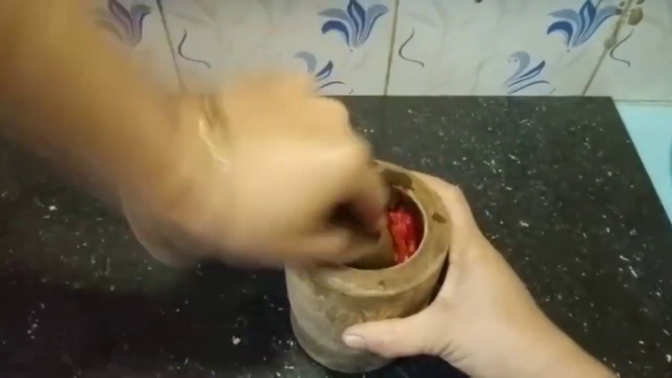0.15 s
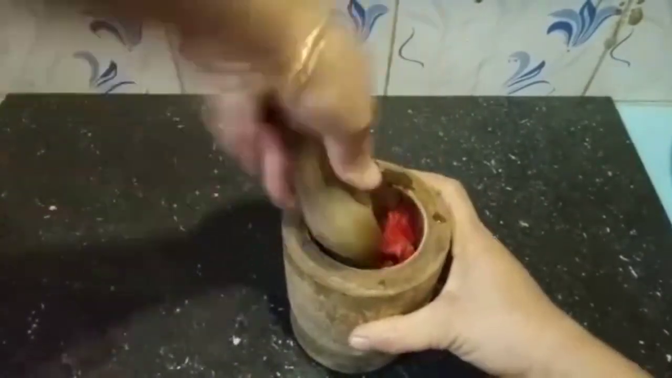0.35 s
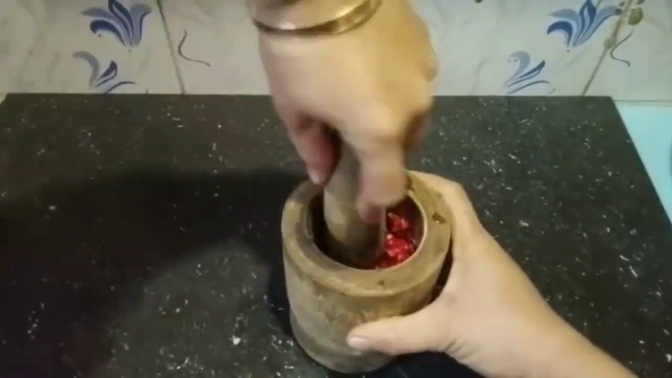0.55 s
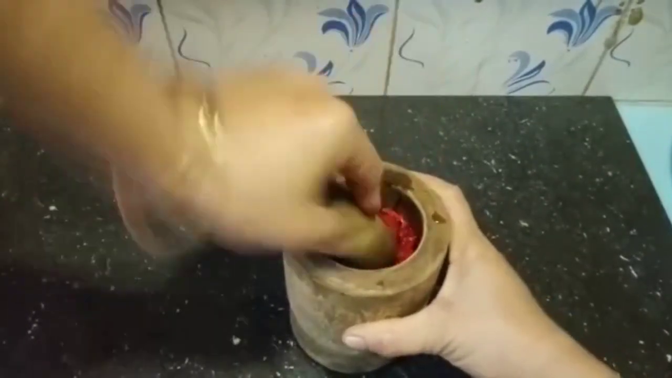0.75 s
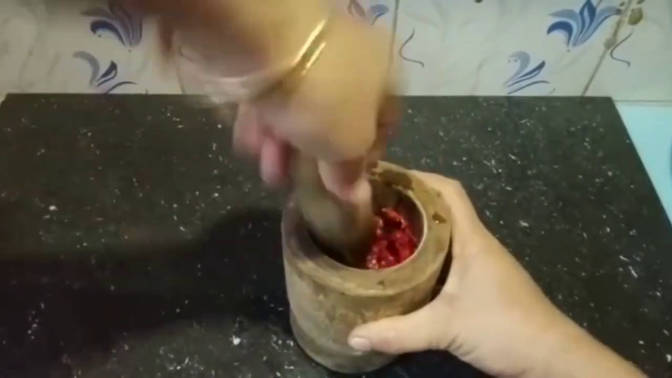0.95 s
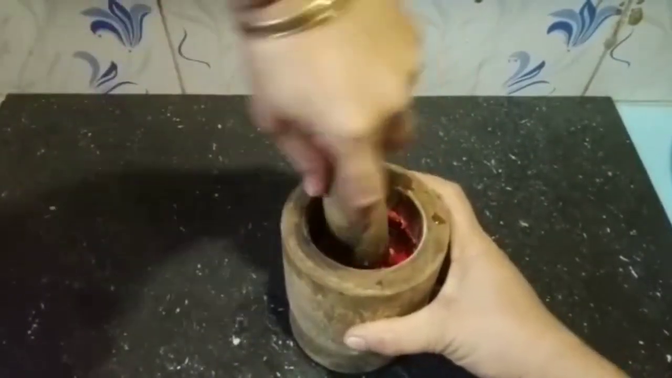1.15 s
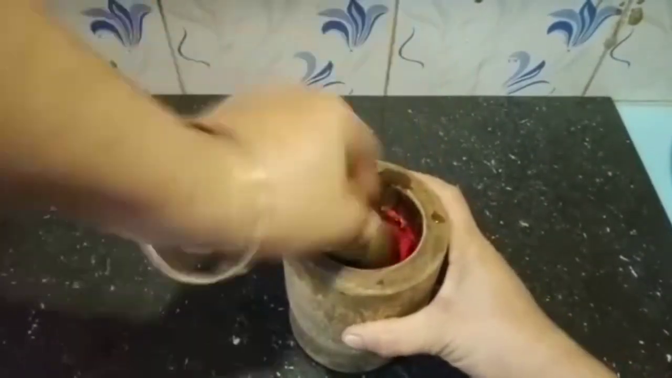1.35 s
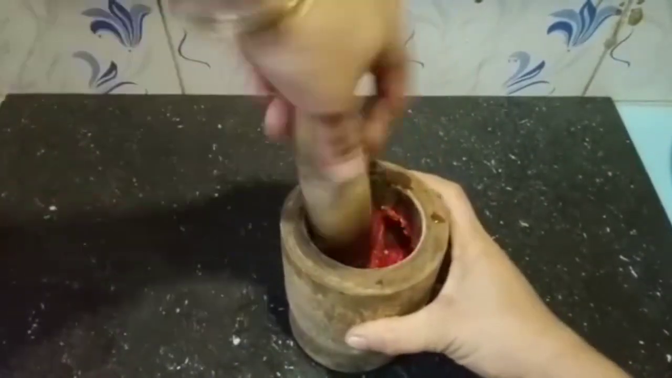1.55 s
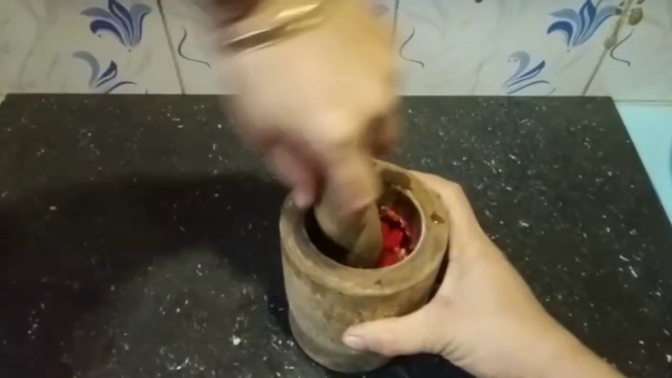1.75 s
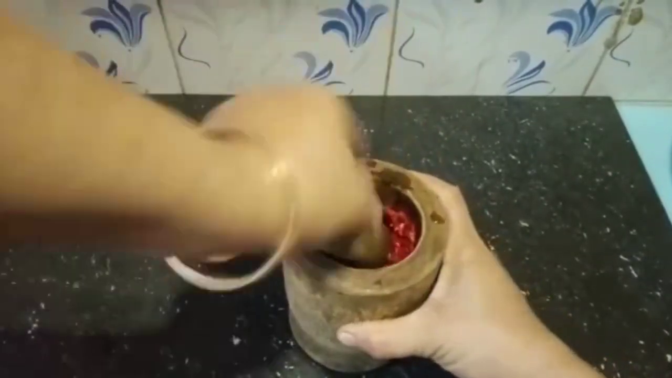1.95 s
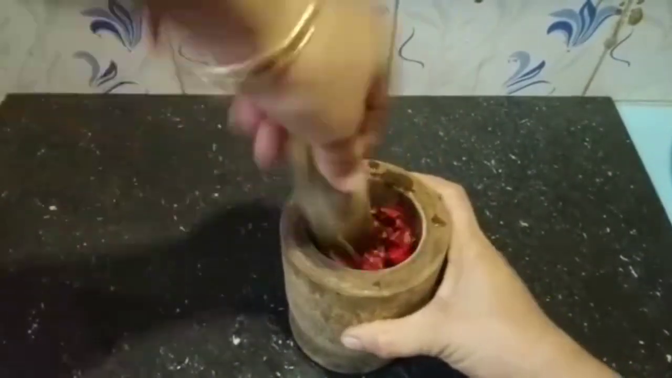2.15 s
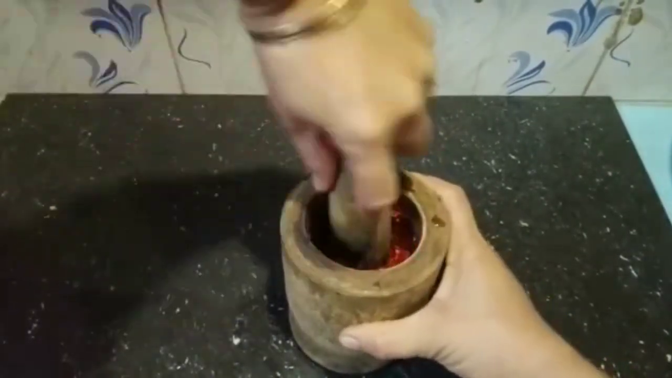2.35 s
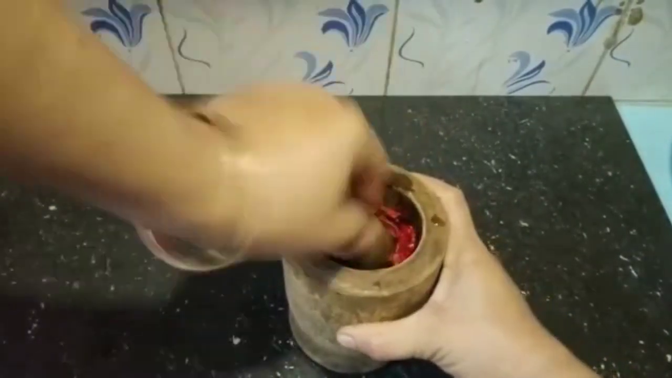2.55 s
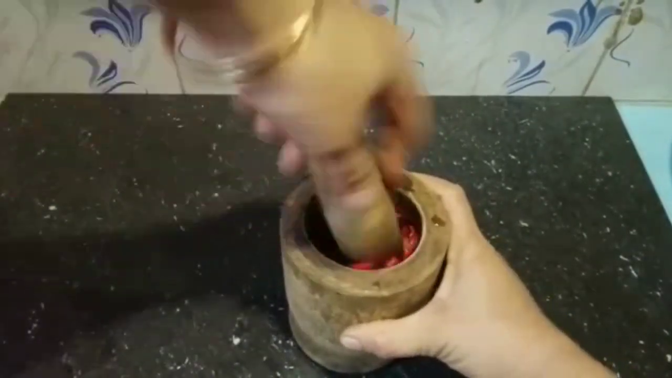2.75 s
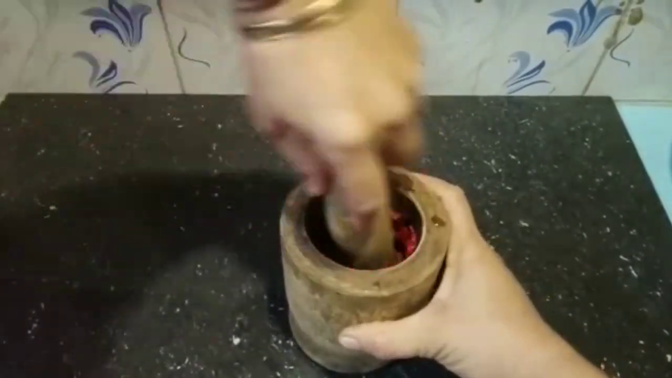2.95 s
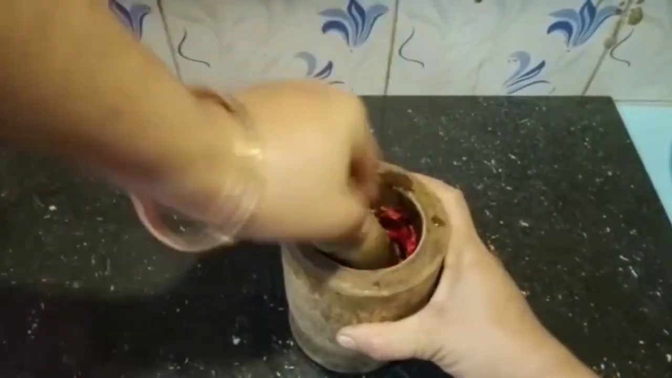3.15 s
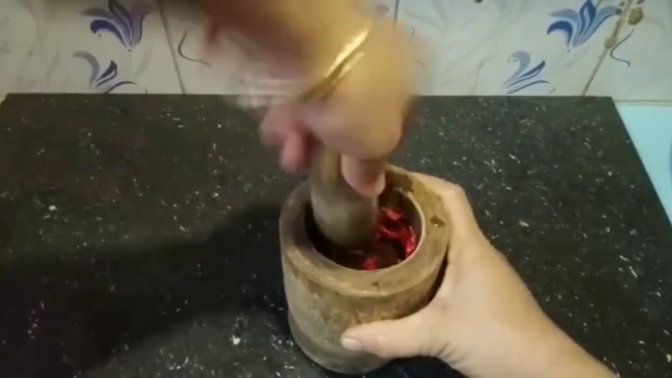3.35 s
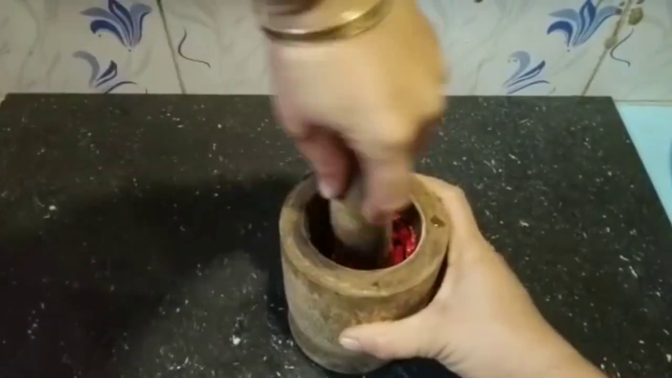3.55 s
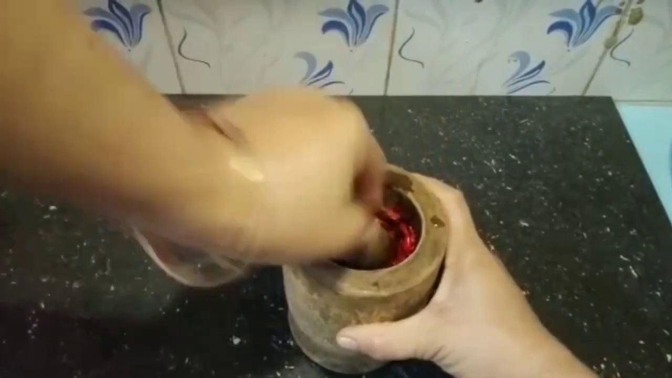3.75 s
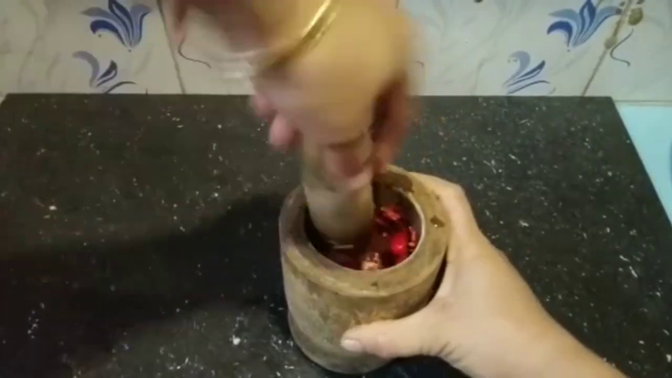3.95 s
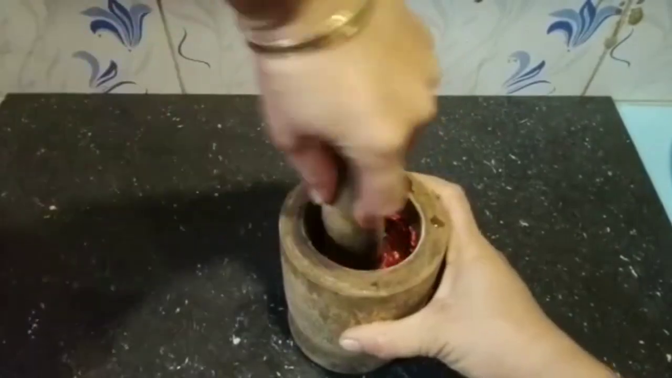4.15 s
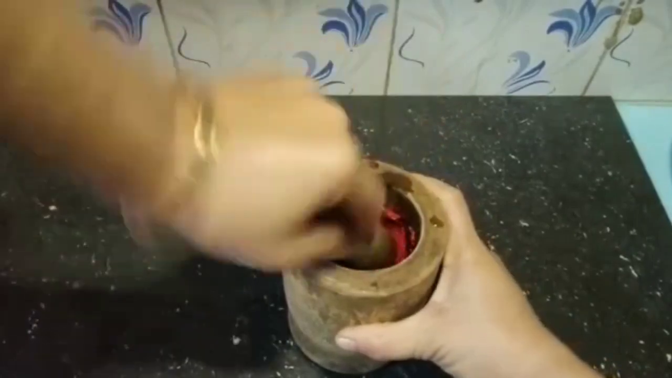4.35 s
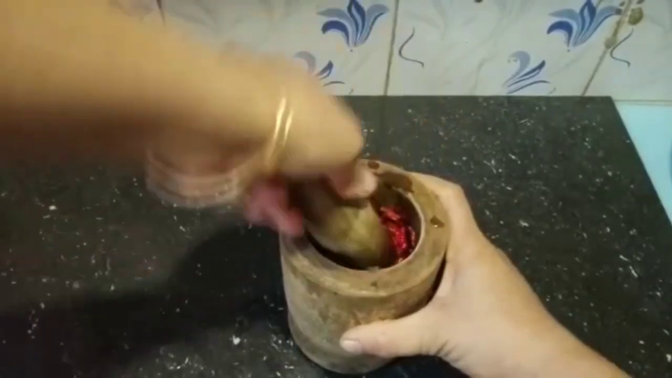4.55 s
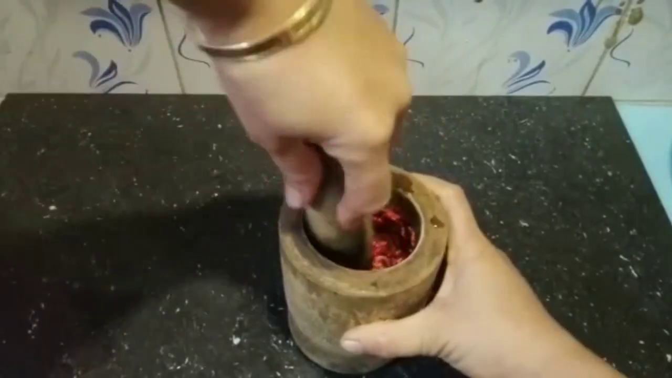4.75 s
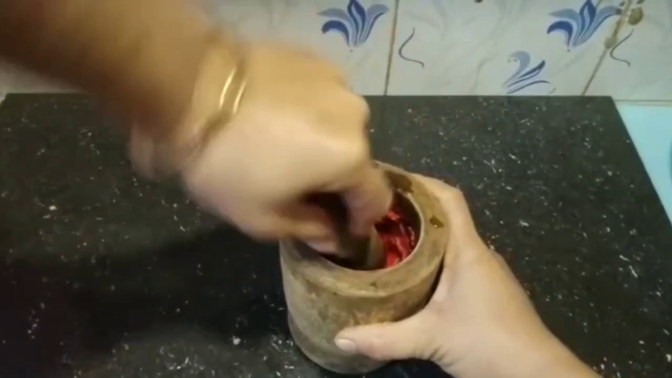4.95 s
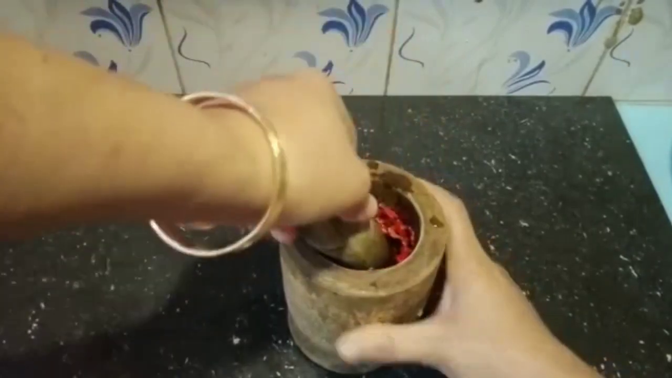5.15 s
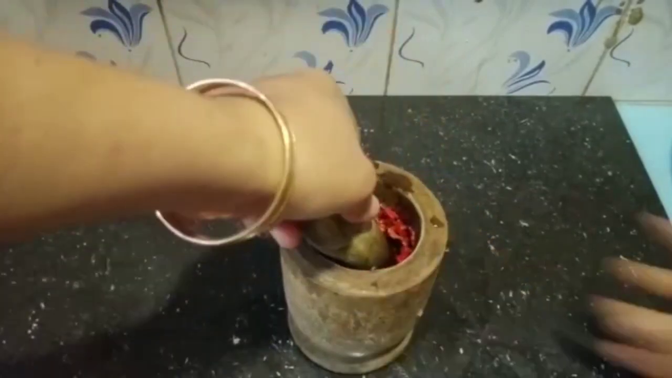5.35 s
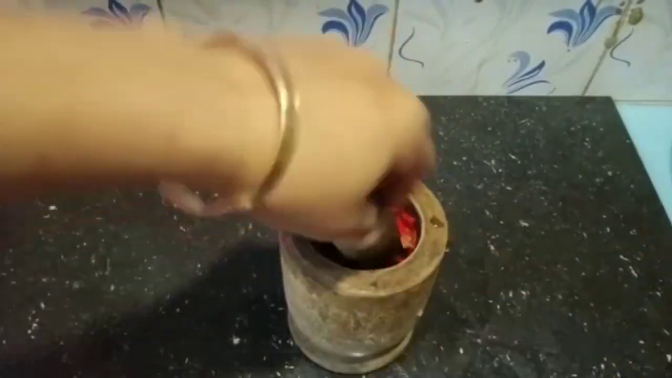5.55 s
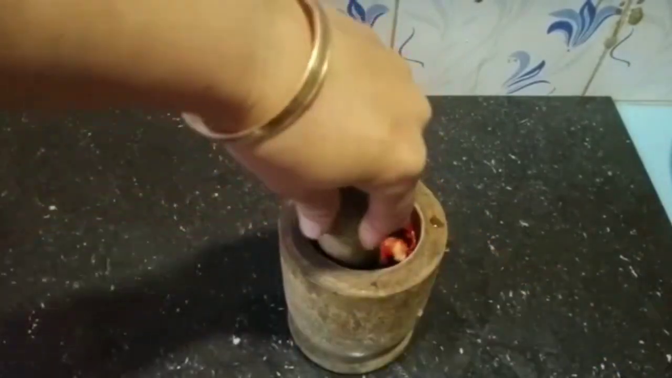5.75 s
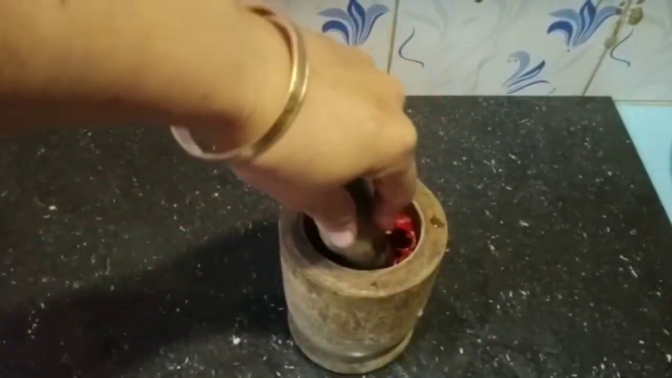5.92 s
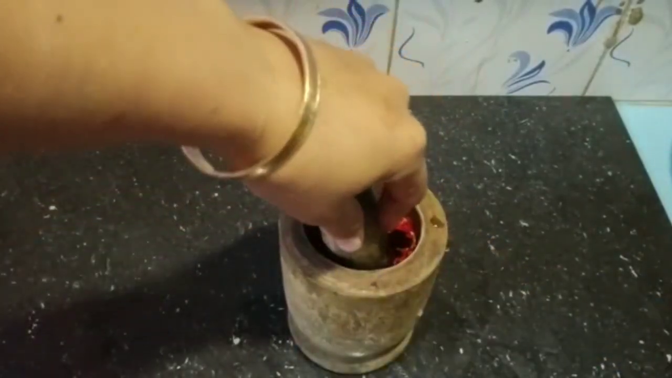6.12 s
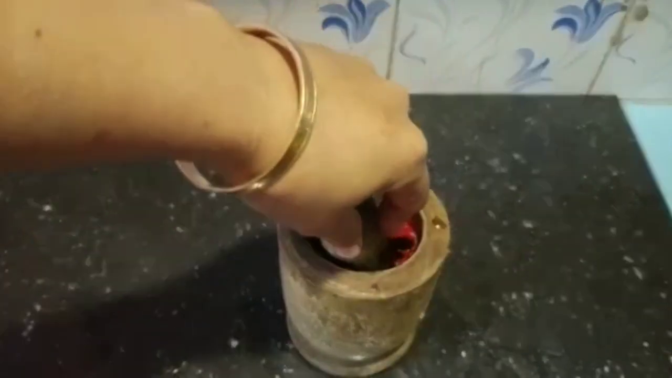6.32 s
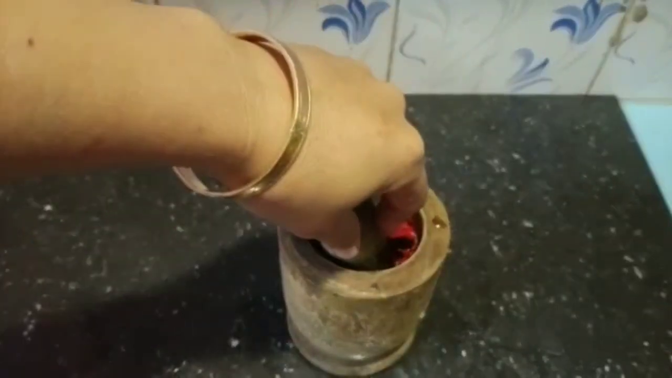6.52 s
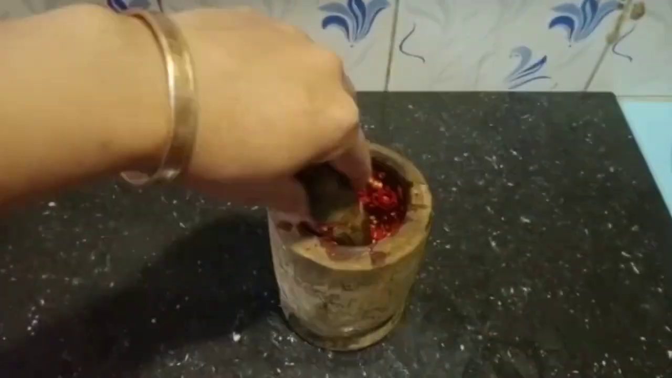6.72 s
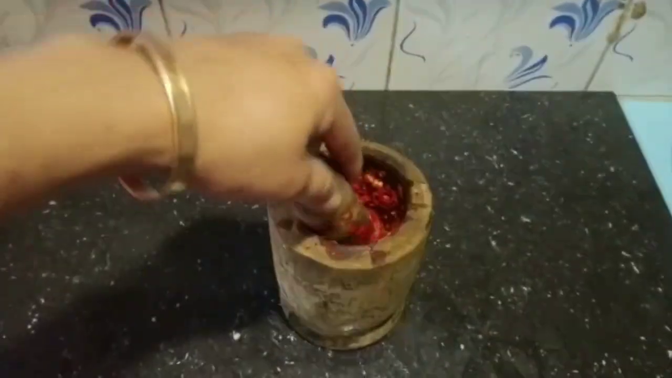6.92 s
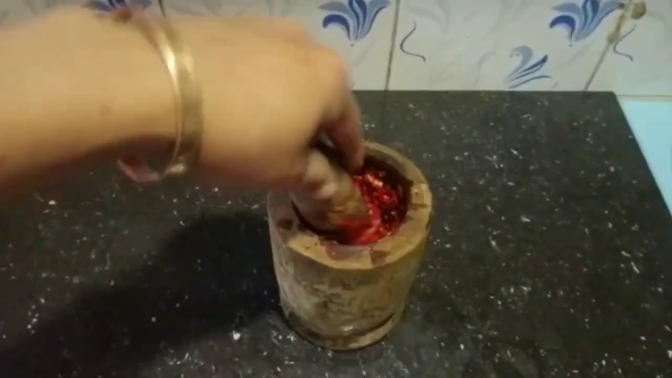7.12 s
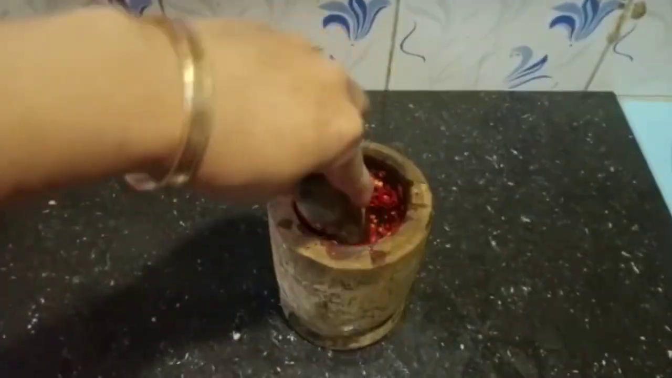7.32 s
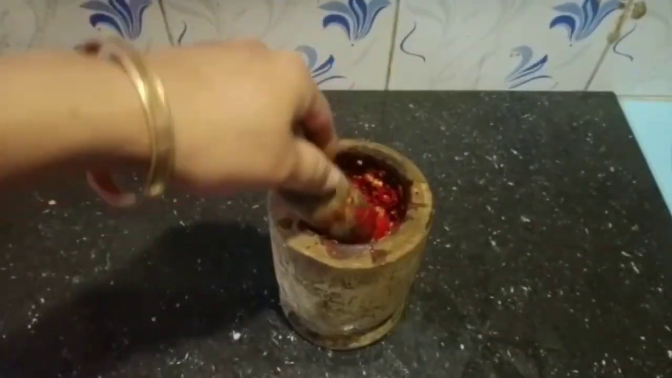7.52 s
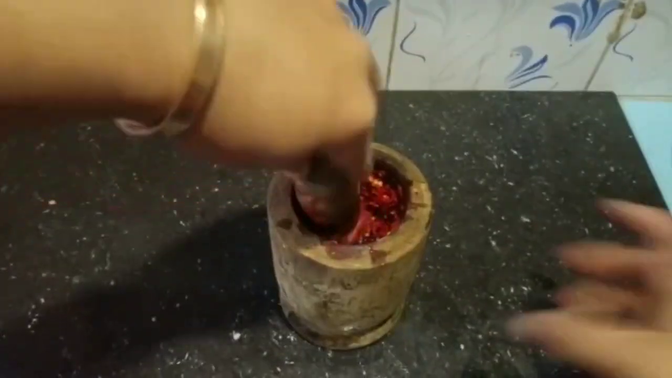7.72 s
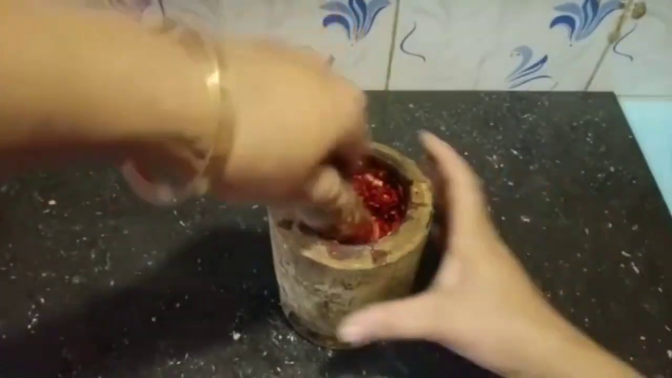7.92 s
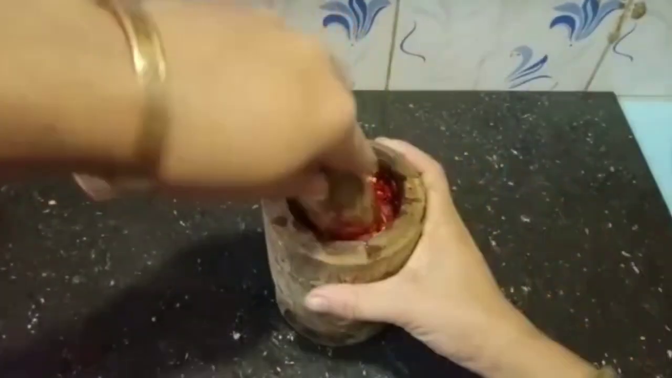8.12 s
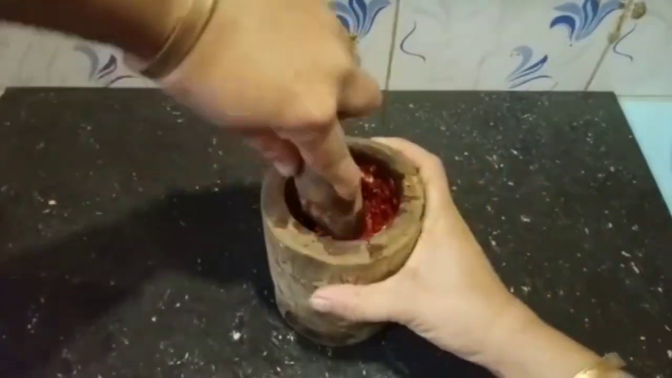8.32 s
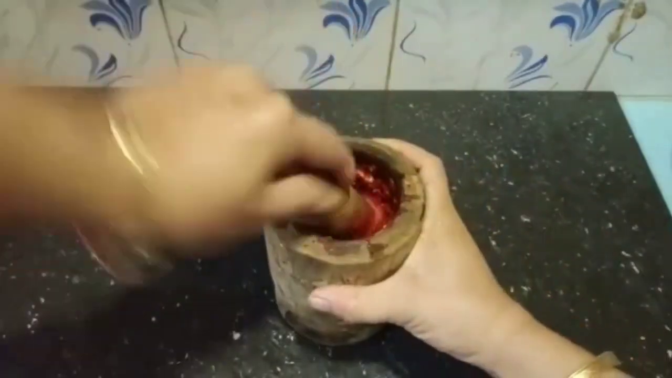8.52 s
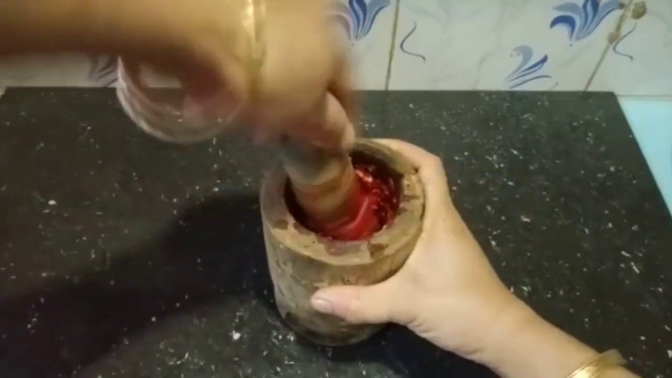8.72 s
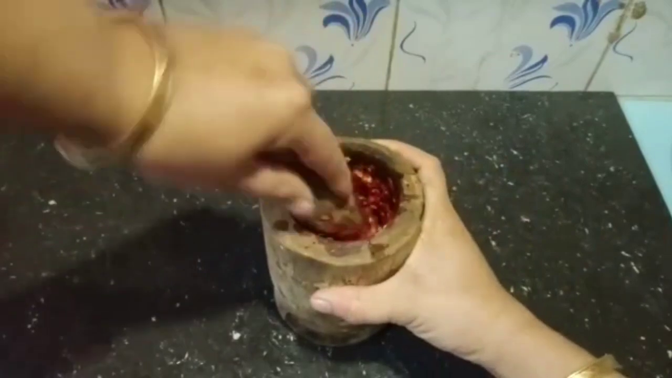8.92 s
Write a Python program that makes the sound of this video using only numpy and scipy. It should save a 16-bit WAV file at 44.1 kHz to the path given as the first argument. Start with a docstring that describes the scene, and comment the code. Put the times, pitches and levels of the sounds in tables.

```python
"""Dull knocks of a wooden pestle pounding chillies in a hand-held wooden mortar, over a bright hiss.
Each blow rings the bowl and bursts the pulp. Between blows the pestle grinds and scrapes the wall
by stick-slip friction, tearing skins and snapping seeds. A stone counter and kitchen tiles echo it,
and air buffets the microphone. The hiss drops away suddenly before the last, lighter blows."""
import sys
import numpy as np
from scipy import signal
from scipy.fft import rfft, irfft
from scipy.io import wavfile
from scipy.ndimage import uniform_filter1d, minimum_filter1d, map_coordinates

SR = 44100
rng = np.random.default_rng(int(sys.argv[2]) if len(sys.argv) > 2 else 0)


def wav_out(sig):
    """Save sig, one row per channel (or a flat mono array), as 16-bit PCM at SR to the path in sys.argv[1]."""
    wavfile.write(sys.argv[1], SR, np.round(np.clip(np.atleast_2d(sig).T, -1, 1) * 32767).astype(np.int16))


N = 400428
TIME = np.arange(N) / SR
TOP_HZ = 15750
HISS_STOP_S = 6.675


def undb(db):
    """Decibels to gain."""
    return 10 ** (np.asarray(db) / 20)


def unit(x):
    """Scale to rms 1."""
    return x / np.sqrt(np.mean(x ** 2))


def log_interp(hz, points):
    """Read (frequency, value) points on a log-frequency axis."""
    point_hz, value = np.transpose(points)
    return np.interp(np.log(hz + 1), np.log(point_hz), value)


def colour(x, points):
    """Minimum-phase filter through (frequency [Hz], gain [dB]) points."""
    size = 2048
    gain = undb(log_interp(np.fft.rfftfreq(size, 1 / SR), points))
    cepstrum = irfft(np.log(gain))
    cepstrum[1:size // 2] *= 2
    cepstrum[size // 2 + 1:] = 0
    return signal.oaconvolve(x, irfft(np.exp(rfft(cepstrum))))[:len(x)]


def band(x, lo_hz, hi_hz, order=2):
    """Butterworth band-pass."""
    return signal.sosfilt(signal.butter(order, [lo_hz, hi_hz], "band", fs=SR, output="sos"), x)


def split(x, hz):
    """The parts below and above a frequency."""
    low = signal.sosfiltfilt(signal.butter(4, hz, fs=SR, output="sos"), x)
    return low, x - low


def resonate(x, resonances):
    """Drive (centre [Hz], width [Hz], gain [dB]) resonances; rms 1."""
    return unit(sum(undb(db) * band(x, hz - width / 2, hz + width / 2) for hz, width, db in resonances))


def recent_mean(x, span_s):
    """Trailing moving average."""
    size = int(span_s * SR)
    return uniform_filter1d(x, size, origin=(size - 1) // 2)


def walk(rate_hz):
    """Random wander, spread near 1."""
    return np.interp(TIME * rate_hz, np.arange(2048), rng.standard_normal(2048))


def hold(start_s, end_s, attack_s, release_s, sag_db_per_s=0):
    """Envelope: linear attack, sagging hold, exponential release."""
    age_s = np.maximum(TIME - start_s, 0)
    release = np.exp(-np.maximum(TIME - end_s, 0) / release_s)
    return np.minimum(age_s / attack_s, 1) * undb(-sag_db_per_s * age_s) * release


def swell(peak_s, length_s, rise_share=0.4):
    """Pressure of one stroke, building and letting go."""
    rise = ((TIME - peak_s) / (rise_share * length_s)) ** 2
    fall = (TIME - peak_s) / ((1 - rise_share) * length_s)
    return np.exp(-np.where(TIME < peak_s, rise, fall))


def slips(rate_hz, spread_db):
    """Stick-slip friction: random impulses of unequal size; rms 1."""
    sizes = undb(spread_db * rng.exponential(size=N).clip(0, 4)) * rng.choice([-1, 1], N)
    return unit(sizes * (rng.random(N) < rate_hz / SR))


def rippled_noise(points, ripple_db, drift_db, drift_hz, smooth_below_hz=1500):
    """Coloured noise with fine spectral ripples, some steady and some drifting; rms 1."""
    hz, t, spectrum = signal.stft(rng.standard_normal(N), SR, nperseg=1024)
    ripples = rng.standard_normal((len(hz) // 2 + 1, 64))
    grid = np.meshgrid(np.arange(len(hz)) / 2, 1 + t * drift_hz, indexing="ij")
    steady = np.interp(grid[0][:, :1], np.arange(len(ripples)), ripples[:, 0])
    drifting = map_coordinates(ripples, grid, order=1, mode="mirror")
    depth = np.clip(hz / smooth_below_hz, 0.4, 1)[:, None]
    spectrum *= undb(depth * (ripple_db * steady + drift_db * drifting))
    return unit(colour(signal.istft(spectrum, SR)[1][:N], points))


# Faint hiss spectrum: (frequency [Hz], gain [dB])
FAINT_SPECTRUM = [(30, -14), (150, -2.5), (350, -6), (700, -12), (1200, -8), (2800, -8), (4000, -4.5),
                  (4850, -9.5), (6300, -3), (8100, 8), (10000, 1), (12700, -5), (15500, -0.5)]

def faint_hiss(high_db=-61, low_db=-69.5, dip_db=-4, settle_s=0.77):
    """A faint hiss whose lower part starts weak and comes up after the loud hiss stops."""
    noise = rippled_noise(FAINT_SPECTRUM, ripple_db=2.7, drift_db=2.5, drift_hz=1.983)
    low, high = split(noise, hz=6130)
    dip = np.exp(-np.maximum(TIME - HISS_STOP_S, 0) / settle_s)
    return unit(high) * undb(high_db) + unit(low) * undb(low_db + dip_db * dip)


# Loud hiss spectrum: (frequency [Hz], gain [dB])
LOUD_SPECTRUM = [(30, -12), (100, -1.5), (220, -3), (370, 0), (700, -7.5), (1500, -7.5), (3000, -11),
                 (3900, -9.5), (4850, -14), (7000, 1), (8600, 1.5), (10500, -2), (12200, -12.5),
                 (13600, -6), (15300, -0.5)]
# Loud hiss contour, before trim: (time [s], body gain [dB], top gain [dB])
HISS_CONTOUR = [(0, -47.5, -50), (1.7, -49, -51), (4.15, -48.5, -49), (4.45, -50.5, -51.5),
                (5.9, -50.5, -48), (6.15, -53, -46), (6.6, -53, -47.5)]

def loud_hiss(trim_db=2, waver_db=0.8):
    """A bright, slightly wavering hiss that thins and brightens."""
    noise = rippled_noise(LOUD_SPECTRUM, ripple_db=2.5, drift_db=3, drift_hz=4)
    body, top = split(noise, hz=12740)
    time_s, body_db, top_db = np.transpose(HISS_CONTOUR)
    body_gain = undb(np.interp(TIME, time_s, body_db) + waver_db * walk(8.8))
    top_gain = undb(np.interp(TIME, time_s, top_db) + waver_db * walk(22))
    return undb(trim_db) * (body * body_gain + top * top_gain)


# Whistling bands: (start [s], end [s], centre [Hz], width [Hz], level [dB])
WHISTLE_BANDS = [(5.15, 6.144, 3685, 160, -70), (6.35, 6.608, 2150, 600, -69)]

def whistles(fade_s=0.041):
    """Narrow bands of noise whistle faintly for a while."""
    return sum(hold(start_s, end_s, fade_s, fade_s) * undb(db)
               * resonate(rng.standard_normal(N), [(hz, width_hz, 0)])
               for start_s, end_s, hz, width_hz, db in WHISTLE_BANDS)


def hiss(cut_s=0.0034):
    """The loud hiss stops abruptly and leaves the faint one."""
    gate = np.clip((HISS_STOP_S - TIME) / cut_s, 0, 1)
    loud, faint = loud_hiss(), faint_hiss()
    return gate * (loud + whistles()) + (1 - gate) * faint


# Air puffs, before trim: (start [s], end [s], level [dB])
AIR_PUFFS = [(3.072, 3.09, -42), (4.354, 4.538, -45), (4.542, 4.67, -46), (5.003, 5.141, -38),
             (5.212, 5.275, -46.5), (5.32, 5.517, -64), (5.657, 5.698, -55.5)]
# Buffet spectrum: (frequency [Hz], gain [dB])
BUFFET_SPECTRUM = [(20, -32), (50, -12), (95, -3.5), (140, -7.5), (220, -24.5), (500, -28), (2000, -83)]

def buffets(trim_db=-1):
    """Low puffs of moving air on the microphone."""
    strength = sum(undb(db) * hold(start_s, end_s, attack_s=0.015, release_s=0.026, sag_db_per_s=27)
                   for start_s, end_s, db in AIR_PUFFS)
    return undb(trim_db) * strength * unit(colour(rng.standard_normal(N), BUFFET_SPECTRUM))


# Room decay: (frequency [Hz], t60 [s])
KITCHEN_T60 = [(150, 0.59), (500, 0.51), (1200, 0.49), (3000, 0.62), (9000, 0.05)]
# Wall reflection spectrum: (frequency [Hz], gain [dB])
WALL_SPECTRUM = [(150, -1.2), (550, 1.5), (1400, 2), (3000, 2.1), (9000, -2)]

def kitchen(x, wet_db, build_s=0.011):
    """Add a diffuse tail from the tiled walls, shorter in the high treble."""
    t = np.arange(SR // 2) / SR
    tail = np.zeros(len(t))
    for hz in 100 * 2 ** np.arange(7):
        octave = band(rng.standard_normal(len(t)), hz, 2 * hz, order=3)
        t60_s = log_interp(hz * np.sqrt(2), KITCHEN_T60)
        tail += octave * undb(-60 * t / t60_s)
    tail *= 1 - np.exp(-(t / build_s) ** 2)
    tail = colour(tail / np.sqrt(np.sum(tail ** 2)), WALL_SPECTRUM)
    return x + undb(wet_db) * signal.oaconvolve(x, tail)[:len(x)]


# Seed snap spectrum: (frequency [Hz], gain [dB])
SEED_SPECTRUM = [(1500, -26.5), (3000, -6.5), (4000, -6.5), (4900, -8), (7000, -3), (9500, 3), (12000, -12),
                 (15000, -9)]

def seeds(crush, gain_db=-7, rate_hz=40, snap_s=0.0068):
    """Seeds and skins snap one by one under the pestle."""
    t = np.arange(SR // 20) / SR
    snaps = signal.oaconvolve(np.abs(slips(rate_hz, spread_db=2.5)), np.exp(-t / snap_s))[:N]
    crackle = unit(colour(snaps * rng.standard_normal(N), SEED_SPECTRUM))
    return undb(gain_db) * crackle * crush


# Tearing skins: (peak time [s], length [s], level [dB], centre [Hz])
SKIN_TEARS = [(0.325, 0.013, -48.5, 2872), (0.547, 0.022, -43.5, 4950), (0.914, 0.019, -50, 2510),
              (1.265, .04, -52, 3810), (1.332, 0.011, -42.5, 8700), (1.853, 0.043, -49.5, 3680),
              (3.002, .01, -48.5, 2980), (3.332, .037, -54, 3000), (4.231, .005, -41, 11000),
              (4.32, 0.016, -44, 7700), (4.985, 0.0099, -43.5, 8700), (5.078, 0.039, -51, 3130),
              (5.885, 0.017, -52.5, 3180), (5.927, 0.017, -59.5, 3290)]

def tears():
    """A chilli skin tears in a short, band-limited run of tiny cracks."""
    cracks = slips(rate_hz=3000, spread_db=2.5)
    return sum(undb(db) * swell(peak_s, length_s) * unit(band(cracks, 0.8 * hz, 1.2 * hz))
               for peak_s, length_s, db, hz in SKIN_TEARS)


# Sliding pestle resonances: (centre [Hz], width [Hz], gain [dB])
PESTLE_RESONANCES = [(1226, 150, 5.5), (2210, 540, -14.5), (3150, 400, -17), (4000, 900, -17.5)]
# Grit spectrum: (frequency [Hz], gain [dB])
GRIT_SPECTRUM = [(600, -12), (1500, -1.5), (3200, 4), (5000, -6), (8000, 3.5), (12000, -8.5),
                 (15000, -42.5)]
# Wall scrapes, before trim: (peak time [s], length [s], level [dB], relative grit [dB])
WALL_SCRAPES = [(.01, 0.065, -47.5, 4.5), (0.549, 0.065, -45.5, 3.5), (1.09, 0.027, -41, -1.5),
                (2.303, 0.016, -38.5, -9), (2.897, 0.015, -41, -12), (3.525, 0.039, -39.5, 1),
                (4.811, 0.04, -40, -1), (8.837, .011, -66, 6)]

def scrapes(trim_db=-1):
    """Wood slides on wood with seeds between: the pestle sings briefly over a gritty rasp."""
    song = resonate(slips(rate_hz=3700, spread_db=2), PESTLE_RESONANCES)
    grit = unit(colour(slips(rate_hz=3000, spread_db=3.5), GRIT_SPECTRUM))
    return sum(undb(db + trim_db) * swell(peak_s, length_s) * (song + undb(grit_db) * grit)
               for peak_s, length_s, db, grit_db in WALL_SCRAPES)


# Pestle skips: (start [s], end [s], level [dB])
WALL_SKIPS = [(2.447, 2.45, -34), (4.139, 4.151, -30.5)]

def skips(grit_db=-9):
    """A quick run of tiny bounces against the wall rings the pestle as it lifts."""
    song = resonate(slips(rate_hz=6000, spread_db=1), PESTLE_RESONANCES)
    grit = unit(colour(slips(rate_hz=4000, spread_db=-1.5), GRIT_SPECTRUM))
    strength = sum(undb(db) * hold(start_s, end_s, attack_s=0.0025, release_s=0.0073)
                   for start_s, end_s, db in WALL_SKIPS)
    return strength * (song + undb(grit_db) * grit)


# Pestle twists: (start [s], lift [s], rumble drive [dB], crush drive [dB])
PESTLE_TWISTS = [(0.063, 0.197, -42.5, -48.5), (0.342, 0.507, -39.5, -53), (0.578, 0.814, -50, -53),
                 (.86, .92, -54, -70), (0.918, 1.08, -37.5, -49.5), (1.125, 1.394, -52, -49.5),
                 (1.58, 1.715, -47, -45), (1.829, 1.963, -45, -52), (2.083, 2.293, -43, -48),
                 (2.39, 2.602, -47, -50.5), (2.646, 2.904, -72, -54.5), (3.036, 3.168, -40.5, -51.5),
                 (3.236, 3.365, -57, -54.5), (3.419, 3.59, -50.5, -52), (3.664, 3.764, -46.5, -50),
                 (3.99, 4.142, -51, -51), (4.223, 4.437, -43, -48.5), (4.453, 4.57, -59, -64),
                 (4.668, 4.806, -48.5, -55.5), (4.92, 5.117, -46.5, -50)]

def twisting(attack_s=0.03, release_s=0.02):
    """Rumble and crush envelopes: the pestle presses in, the pulp yields, the pestle lifts."""
    rumble, crush = np.zeros((2, N))
    for start_s, lift_s, rumble_db, crush_db in PESTLE_TWISTS:
        rumble += undb(rumble_db) * hold(start_s, lift_s, attack_s, release_s, sag_db_per_s=28)
        crush += undb(crush_db) * hold(start_s, lift_s, attack_s, release_s, sag_db_per_s=18.5)
    return rumble, crush


# Mortar modes: (frequency [Hz], level [dB], t60 [s])
MORTAR_MODES = [(193, -8.5, 0.15), (338.2, 0, 0.094), (408.7, 4, 0.038), (449, -2, 0.077),
                (571, -6.5, 0.063), (647, 1.5, 0.06), (693.3, 0.5, 0.069), (750, -8, 0.075),
                (996, -4.5, 0.056), (1160, -11, 0.027), (1309.4, -8, 0.08), (1425, -6, 0.033),
                (1630, -12, .025), (1770, -7, 0.033), (2096, -8.5, 0.05), (2302, -14, .03),
                (2450, -17, 0.018), (3280, -23, .02), (3760, -11.5, 0.057)]

def bowl(t, detune, scatter_db):
    """The mortar's ring; where the pestle lands shifts and weights the modes."""
    hz, db, t60_s = np.transpose(MORTAR_MODES)
    shift, offset, weight = rng.uniform(-1, 1, (3, len(hz)))
    phase = 2 * np.pi * np.outer(hz * (1 + detune * shift), t) + np.pi / 2 * offset[:, None]
    decay = undb(-60 * t / t60_s[:, None])
    return undb(db + scatter_db * weight) @ (np.sin(phase) * decay)


# Pestle judder under load: (centre [Hz], width [Hz], gain [dB])
CHATTER_RESONANCES = [(1243, 770, -4.5), (1600, 69, -13), (1950, 220, 1), (3960, 160, -6)]
# Pulp crunch spectrum: (frequency [Hz], gain [dB])
CRUNCH_SPECTRUM = [(500, -17), (1250, 6.5), (1600, -7.5), (2200, 3.5), (3100, -2.5), (4000, -4),
                   (4900, -12), (8000, -26)]
# Hard pushes, before trim: (peak time [s], length [s], level [dB], relative chatter [dB])
PULP_PUSHES = [(0.413, .04, -44, -13), (0.472, 0.021, -37.5, -10.5), (0.718, 0.052, -45, -8.5),
               (0.764, 0.019, -39.5, -22), (0.975, 0.055, -34.5, -6), (1.294, 0.095, -41, -9),
               (2.12, 0.0098, -37, -10.5), (2.15, 0.014, -35.5, -5.5), (2.187, 0.029, -35, -9.5),
               (2.537, 0.05, -40, -11.5), (2.823, 0.043, -34, -32.5), (3.139, 0.034, -48, -3),
               (4.095, 0.035, -39.5, -9), (4.767, 0.013, -41.5, -7)]

def grinding(rumble, crush, bowl_db=-3, crunch_db=-5, push_trim_db=-1, rough_db=6):
    """The pestle drags through the pulp: slips shake the bowl, the pestle judders, skins crackle."""
    friction = slips(rate_hz=1000, spread_db=2.5)
    ring = bowl(np.arange(SR // 8) / SR, detune=0.0091, scatter_db=1.8)
    shake_spectrum = [(150, -1), (350, 7.5), (650, 7.5), (1000, -3.5),
                      (1500, -11.5), (2100, -6), (4000, -8)]
    shake = unit(colour(signal.oaconvolve(friction, ring)[:N], shake_spectrum))
    chatter = resonate(friction, CHATTER_RESONANCES)
    crunch = unit(colour(slips(rate_hz=1500, spread_db=-1), CRUNCH_SPECTRUM))
    twists = undb(bowl_db) * shake * rumble + undb(crunch_db) * crunch * crush
    pushes = sum(undb(db) * swell(peak_s, length_s) * (shake + undb(chatter_db) * chatter)
                 for peak_s, length_s, db, chatter_db in PULP_PUSHES)
    return undb(push_trim_db) * pushes + undb(rough_db * walk(45)) * twists


def cushion(knock, target_db, bass_db=-3):
    """The chillies dull a knock: steer its thud, body, clack and crack peaks to the target levels."""
    edges_hz = [(150, 400), (400, 800), (800, 1700), (1700, 5000)]
    centres_hz = [110, 290, 570, 1150, 2300, 7000]
    for _ in range(2):  # the bands overlap, so one pass falls short
        peak_power = [uniform_filter1d(band(knock, lo, hi, order=3) ** 2, size=220).max()
                      for lo, hi in edges_hz]
        db = target_db - 10 * np.log10(peak_power)
        deep_db, top_db = min(db[0], db[1]) + bass_db, min(db[1], db[3])
        knock = colour(knock, list(zip(centres_hz, [deep_db, *db, top_db])))
    return knock


# Reflections off counter, hand and tiles: (delay [s], gain [linear])
EARLY_ECHOES = [(.0016, 0.28), (.0044, 0.15), (.0078, 0.23)]

def echoes(direct, t):
    """Nearby surfaces reflect a blow; the moving hand changes the paths each time."""
    stretch = 1 + 0.1 * rng.standard_normal()
    return sum(gain * np.interp(t - delay_s * stretch, t, direct, left=0)
               for delay_s, gain in EARLY_ECHOES)


# Bursting pulp spectrum: (frequency [Hz], gain [dB])
SPLAT_SPECTRUM = [(80, -29.5), (180, -11.5), (350, -2), (650, 0), (830, -2), (1350, -4), (2500, -10),
                  (4000, -20.5), (6000, -30), (12000, -42.5)]
# Blows: (time [s], body peak [dB], relative thud [dB], relative clack [dB])
PESTLE_BLOWS = [(0.045, -28, -3, -17), (0.295, -46.5, 1, -8.5), (0.347, -27, -7.5, -3.5),
                (0.568, -31, -2, -13.5), (1.113, -28.5, -6.5, -8), (1.542, -16, -8, 0),
                (1.752, -23.5, -8.5, -14), (2.047, -20, -11.5, -6.5), (2.056, -22, -13, -7.5),
                (2.347, -24.5, -7, -15.5), (2.647, -39.5, -1.5, -11), (3.016, -22, -6, -11.5),
                (3.378, -42.5, 6, -9.5), (3.622, -26.5, -9, -14), (3.884, -35, -3, -7),
                (3.956, -22.5, -7, -7.5), (4.23, -26, -6, -9), (4.648, -23, -7, -5.5),
                (4.896, -28, -7, -4.5), (7.189, -52.5, -6.5, -9.5), (7.38, -63.5, -1, -8.5),
                (7.533, -42.5, -7, -6), (7.946, -57.5, -10, -14), (8.001, -59, -2.5, -20.5),
                (8.088, -35.5, -14, -3.5), (8.406, -34.5, -15, -16), (8.65, -61, -4, -15.5),
                (8.775, -40, -9.5, -10), (8.906, -37.5, -10.5, -9.5)]

def blows(splat_db=-3, splat_s=0.015, contact_s=0.00058, crack_re_clack_db=-9):
    """Each blow rings the bowl and bursts the pulp; the last, light ones sound drier."""
    t = np.arange(SR // 2) / SR
    contact = 1 - np.exp(-t / contact_s)
    track = np.zeros(N + len(t))
    for time_s, body_db, thud_db, clack_db in PESTLE_BLOWS:
        ring = unit(bowl(t, detune=0.0099, scatter_db=4))
        burst = rng.standard_normal(len(t)) * np.exp(-(t / splat_s) ** 2)
        splat = undb(splat_db) * unit(colour(burst, SPLAT_SPECTRUM))
        direct = band((ring + splat) * contact, 135, TOP_HZ)  # a small bowl radiates no deep bass
        knock = kitchen(direct + echoes(direct, t), wet_db=-16 if time_s < HISS_STOP_S else -18.5)
        target_db = body_db + np.array([thud_db, 0, clack_db, clack_db + crack_re_clack_db])
        track[int(time_s * SR):][:len(t)] += cushion(knock, target_db)
    return track[:N]


def scene():
    """Mortar and pestle in the kitchen, with air and hiss at the microphone; mono."""
    rumble, crush = twisting()
    rubbing = grinding(rumble, crush) + scrapes() + skips() + tears() + seeds(crush)
    rubbing = band(rubbing, 120, TOP_HZ)
    return (blows() + kitchen(rubbing, wet_db=-17) + buffets() + hiss())[None]


def record(dry, limit_db=-17, sense_s=0.016, hold_s=0.074, slew_s=0.02):
    """An rms limiter ducks briefly after the hardest blow; the top is cut steeply."""
    rms = np.sqrt(np.maximum(recent_mean(dry[0] ** 2, sense_s), 1e-12))
    gain = np.minimum(undb(limit_db) / rms, 1)
    size = int(hold_s * SR)
    held_gain = minimum_filter1d(gain, size, origin=(size - 1) // 2)
    lowpass = signal.ellip(12, 0.1, 80, TOP_HZ, fs=SR, output="sos")
    return signal.sosfilt(lowpass, dry * recent_mean(held_gain, slew_s))


dry = scene()
out = record(dry)
wav_out(out)
```